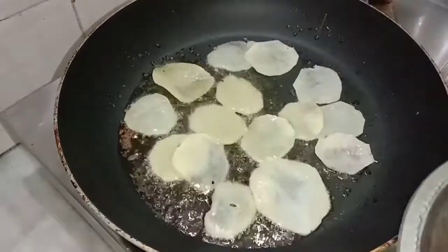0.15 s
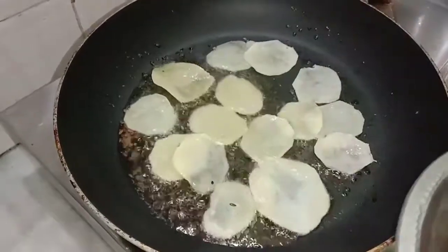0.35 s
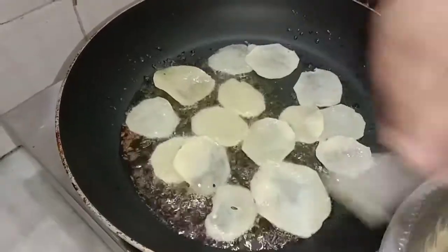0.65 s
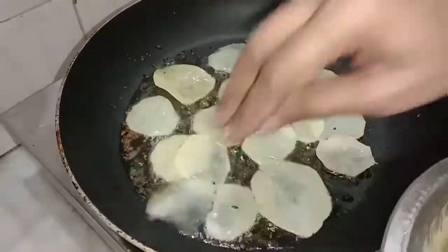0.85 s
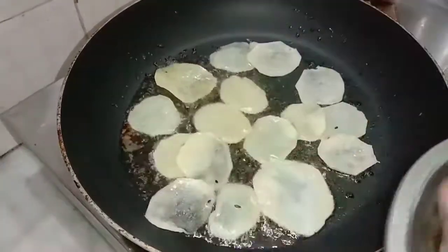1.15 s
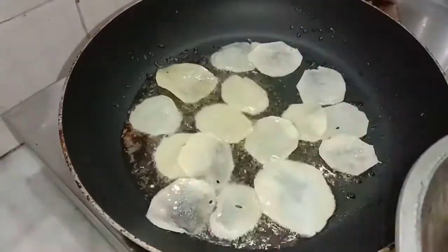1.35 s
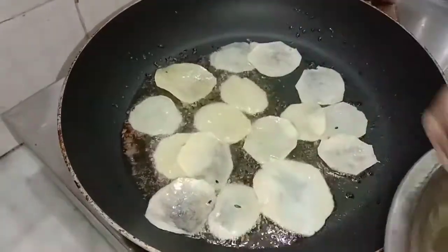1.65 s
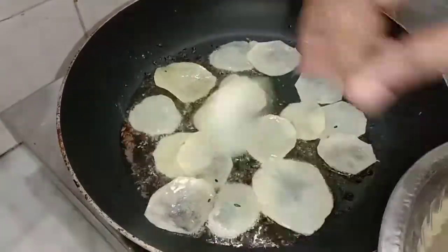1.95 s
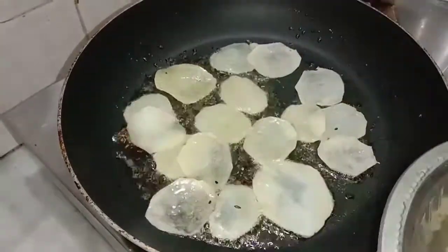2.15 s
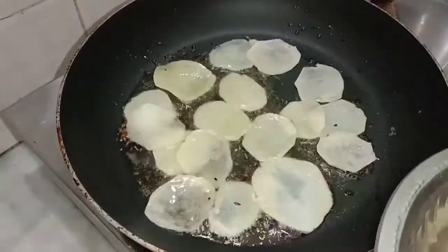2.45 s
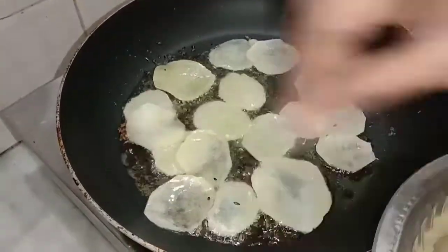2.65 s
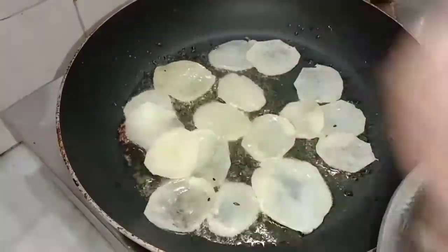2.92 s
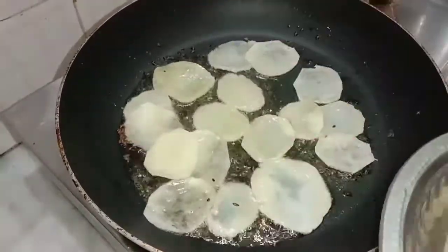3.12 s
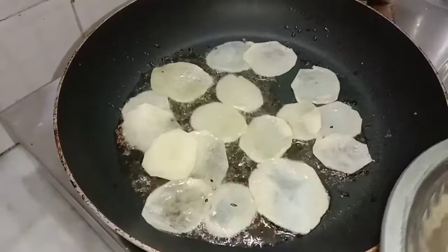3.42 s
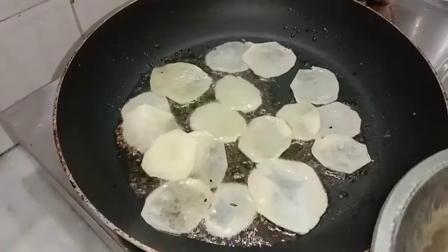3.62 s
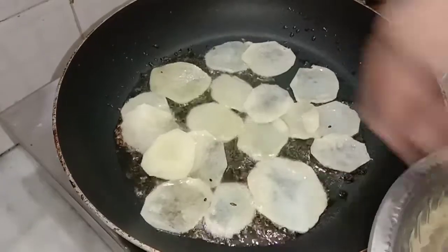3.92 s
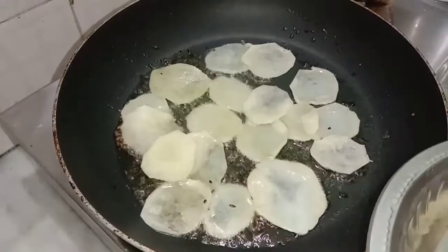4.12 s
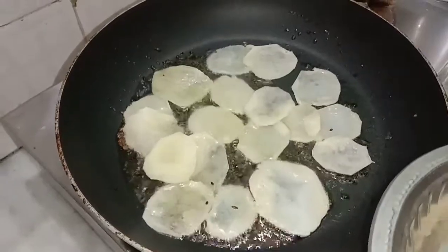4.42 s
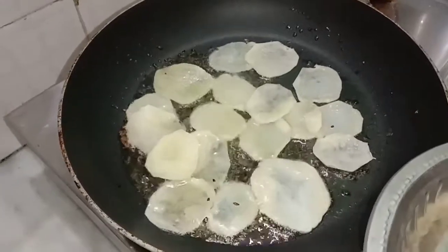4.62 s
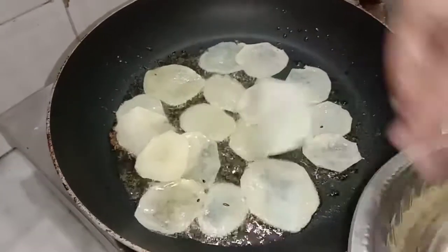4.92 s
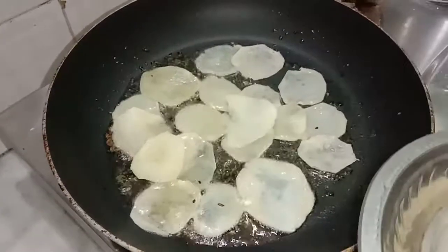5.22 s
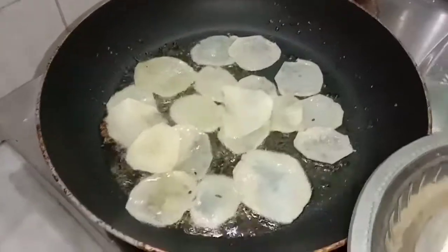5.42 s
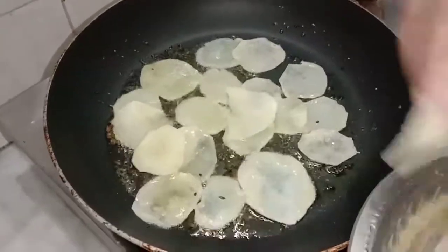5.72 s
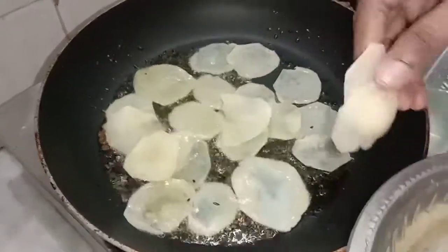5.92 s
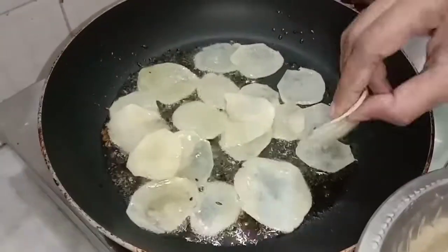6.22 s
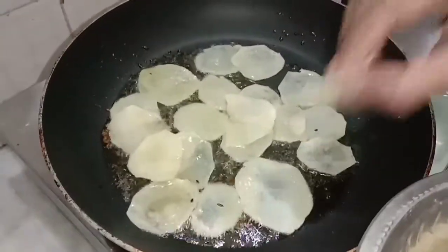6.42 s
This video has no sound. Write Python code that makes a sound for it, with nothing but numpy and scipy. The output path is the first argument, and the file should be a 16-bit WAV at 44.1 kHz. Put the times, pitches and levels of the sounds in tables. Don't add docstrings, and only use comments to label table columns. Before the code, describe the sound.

Close, bright frying sizzle in a pan, peppered with loud snaps and singing bubble pops, gradually calming; faint bird caws and soft bowl knocks behind.

```python
import sys
import numpy as np
from scipy import signal
from scipy.fft import rfft, irfft
from scipy.io import wavfile
from scipy.ndimage import minimum_filter1d

SR = 44100
rng = np.random.default_rng(int(sys.argv[2]) if len(sys.argv) > 2 else 0)


def generate_wav(sig):
    pcm = np.round(np.clip(np.atleast_2d(sig).T, -1, 1) * 32767).astype(np.int16)
    wavfile.write(sys.argv[1], SR, pcm)


def level_to_linear(level):
    exponent = np.asarray(level, float) / 20
    return 10 ** exponent


N = 289296

# (time [s], peak level [dB], bubble pitch [Hz], pan blow re peak [dB])
BIG_POPS = [(0.0765, -12, 3600, -17), (0.3537, -11.5, 4000, -15.5), (0.608, -12, 3500, -27),
            (1.045, -12.5, 3900, -18), (1.3437, -14, 4000, -16), (1.8921, -7.5, 3800, -17),
            (2.0163, -7.5, 2800, -44), (2.029, -8.5, 2980, -19), (2.0549, -12.5, 1950, -17),
            (2.061, -11, 2480, -32), (2.045, -10, 2900, -30), (2.376, -20, 3820, -22),
            (2.6692, -13.5, 3700, -26), (2.7038, -9.5, 3500, -40), (2.722, -17, 3580, -29),
            (2.7586, -17.5, 3550, -14), (2.813, -12, 3550, -21), (3.052, -15, 2900, -30),
            (3.271, -13, 4450, -28), (4.0605, -16.5, 3040, -27), (4.2506, -12.5, 3600, -19),
            (4.2877, -11, 2680, -32), (4.3056, -13, 2500, -17), (4.395, -13, 3410, -37),
            (4.498, -13, 4000, -30), (4.5082, -13, 4170, -21), (5.6077, -16, 3170, -35),
            (5.653, -15, 3770, -24), (5.9268, -13, 3930, -33), (6.1332, -14, 3580, -33),
            (6.309, -9.5, 4200, -27), (0.5355, -15, 3150, -30), (1.2473, -17, 3100, -35),
            (2.4926, -19, 2510, -25), (2.636, -26, 2800, -32), (3.682, -14, 4040, -30),
            (3.87, -15.5, 3020, -30), (2.712, -14, 3760, -30), (2.0556, -10, 3750, -30),
            (2.035, -18, 3270, -30), (4.6064, -17, 3684, -30), (4.6786, -11.5, 4090, -23),
            (4.7388, -13.5, 2650, -30), (4.793, -25, 3830, -30), (4.9475, -13.5, 2980, -13),
            (4.975, -14.5, 4600, -35), (5.4048, -11.5, 3860, -31), (5.4605, -16, 3800, -17),
            (5.9988, -17.5, 4060, -36), (6.4946, -19, 3890, -27)]
# (time [s], peak level [dB], bubble pitch [Hz], opening crack re peak [dB])
SMALL_POPS = [(0.0164, -22, 8580, 4), (0.1745, -1, 9300, -2), (0.3056, -10, 8800, -11),
              (0.3315, -5.5, 9700, 5), (0.3765, -4, 9300, -9), (0.4064, -2.5, 7200, 1.5),
              (0.566, -9.5, 9400, 5), (0.651, -9, 7100, -3), (0.767, -4, 7100, 2), (0.914, -25, 8950, -5),
              (1.05, 1, 9700, -4), (1.246, -13, 9200, 5), (1.265, -8, 6560, 1.5), (1.364, -8, 9150, 4),
              (1.8232, -16, 8800, 4), (2.132, -5, 9500, -4), (2.3013, -12, 8800, 12), (2.387, -1, 9500, -4),
              (2.5309, -5, 9120, -7), (2.833, -10.5, 8850, 3), (3.1975, -7, 10200, 5),
              (3.3692, -5, 8750, -7), (3.404, -9.5, 6650, 0), (3.8207, -9, 8240, 6),
              (4.8936, -6.5, 6700, -2), (4.827, -14, 6760, -7), (4.839, -11, 6500, -0.5),
              (4.765, -16, 6850, -11), (4.9307, -10, 8350, 6), (5.2202, -8.5, 5860, -4),
              (5.3666, -7, 9700, -14), (5.4048, -1.5, 8850, -11), (5.46, -7.5, 7200, 1),
              (5.9866, -9, 7270, 4)]
# (time [s], peak level [dB], centre [Hz], pan blow re peak [dB])
SLAMS = [(0.466, 0, 3970, -12), (0.767, -8, 4000, -44), (0.8251, -5.5, 2960, -11.5),
         (0.8724, -8.5, 3550, -8.5), (0.9328, -15, 2750, -6), (1.1516, 0.5, 2970, -13),
         (1.3217, -6, 3380, -11), (1.8524, 2.5, 3960, -16.5), (3.1499, -13.5, 1980, -3.0),
         (3.3298, -12.5, 1970, -3), (3.438, -8.5, 3470, -12.5), (3.976, -18, 3470, 4),
         (4.1597, -9, 1790, -11), (4.44, -10, 3840, -8.5), (4.6685, -14, 2900, -7.5),
         (5.367, -7.5, 3440, -6.5), (5.7356, -9, 3570, -15.5), (5.6077, -10, 4000, -24),
         (4.881, -20, 2500, -6), (5.031, -19, 3000, -9), (0.3311, -17, 3000, -9.5),
         (0.6529, -15, 5000, -20)]
# (frequency [Hz], density [dB per Hz])
CRACK = [(300, -42), (700, -24), (1200, -9.5), (3000, -4.5), (9500, -1), (13600, -13), (14900, -1),
         (15500, 0)]


def rms_one(x):
    return x / np.sqrt(np.mean(x ** 2) + 1e-20)


def in_time(rows):
    s, *columns = np.transpose(rows)
    return [np.interp(np.arange(N) / SR, s, c) for c in columns]


def colour(x, points):
    point_hz, point_db = np.transpose(points)
    hz = np.maximum(np.fft.rfftfreq(4096, 1 / SR), 1)
    gain_db = np.interp(np.log(hz), np.log(point_hz), point_db)
    cepstrum = irfft(np.log(level_to_linear(gain_db)))
    cepstrum[1:2048] *= 2
    cepstrum[2049:] = 0
    impulse = irfft(np.exp(rfft(cepstrum)))
    return signal.fftconvolve(x, impulse)[:len(x)]


def resonance(x, hz, width_hz):
    r = np.exp(-np.pi * width_hz / SR)
    b = [(1 - r * r) / 2, 0, (r * r - 1) / 2]
    a = [1, -2 * r * np.cos(2 * np.pi * hz / SR), r * r]
    return signal.lfilter(b, a, x + 1e-18)


def chance_clicks(per_s, spread_db):
    size_db = spread_db * np.minimum(rng.exponential(1, N), 4)
    return (rng.random(N) < per_s / SR) * level_to_linear(size_db)


def fade(s, start, end, edge_s):
    return np.clip(np.minimum(s - start, end - s) / edge_s, 0, 1)


def add(out, s, sound):
    i = round(s * SR)
    out[i:i + len(sound)] += sound[:N - i]


def rumble():
    # (frequency [Hz], density [dB per Hz])
    rumble_spectrum = [(15, -70), (25, -10), (43, -14.5), (102, 3), (164, 1.5), (233, -11), (303, -4),
                       (379, -17.5), (700, -17), (910, -5), (1540, -120)]
    # (time [s], length [s], rise [dB])
    swells = [(0, 0.17, 8.6), (1.28, 0.32, 5.2), (1.9, 0.095, 14), (2.1, .3, 2.4), (3.05, 0.43, 4.1),
              (3.25, 0.17, 2.3), (5.1, 0.088, 9.3), (5.42, 0.12, 16), (5.72, 0.28, 7.5), (6.3, 0.3, 5.6)]
    s, db = np.arange(N) / SR, -58
    for at, length_s, rise_db in swells:
        db = db + rise_db * np.exp(-(2 * (s - at) / length_s) ** 2)
    return level_to_linear(db) * rms_one(colour(rng.standard_normal(N), rumble_spectrum))


def bird():
    # (start [s], end [s], pulse rate [per s], throat pitch [Hz], level [dB])
    caws = [
        (0.312, 0.495, 106, 1540, -32.5),
        (0.832, 1.126, 157, 1510, -31),
        (1.416, 1.773, 118, 1650, -30),
        (5.478, 5.87, 94, 1560, -36.5),
        (6.36, 6.604, 124, 1380, -33.5),
    ]
    # (start [s], end [s], pitch [Hz], level [dB])
    whistles = [(0, 0.115, 512, -55), (0.237, 0.437, 448, -56), (0.93, 1.12, 1590, -40),
                (0.384, 0.497, 1593, -41), (1.46, 1.72, 900, -50), (1.46, 1.6, 1790, -41),
                (1.55, 1.71, 1830, -40), (5.5, 5.63, 1830, -45), (5.62, 5.84, 1590, -44),
                (6.38, 6.56, 1590, -44), (1.39, 1.803, 365, -67.5), (3.497, 3.612, 295, -63.5),
                (4.38, 4.48, 295, -63), (4.595, 4.71, 298, -61), (4.946, 5.037, 298, -55),
                (5.2, 5.29, 295, -56), (5.42, 5.62, 101, -52), (6.3, 6.5, 104, -57)]
    waver, waver_hz = .006, 9
    s, out = np.arange(N) / SR, np.zeros(N)
    rasp = rng.standard_normal(N)
    for start, end, per_s, hz, db in caws:
        pulses = np.diff(np.floor(per_s * s), prepend=0) + .06 * rasp
        throat = resonance(resonance(pulses, hz, 530), hz, 590)
        out += level_to_linear(db) * rms_one(throat) * fade(s, start, end, edge_s=0.11)
    for start, end, hz, db in whistles:
        swing = waver * hz / waver_hz * np.sin(2 * np.pi * waver_hz * s)
        note = np.sin(2 * np.pi * hz * s + swing)
        out += level_to_linear(db + 7.5) * note * fade(s, start, end, edge_s=0.042)
    return out


def knocks():
    # (time [s], peak level [dB], low edge [Hz], high edge [Hz], t60 [s])
    bowl_hits = [(1.26, -22, 134, 310, 0.036), (1.277, -28, 150, 397, 0.035), (1.322, -23, 252, 1100, 0.17),
                 (1.894, -30, 120, 800, 0.11), (2.49, -39, 302, 650, 0.43), (2.99, -30, 400, 1010, 0.29),
                 (3.179, -21.5, 111, 330, 0.047), (3.974, -23.5, 400, 1280, 0.27),
                 (3.981, -35.5, 120, 218, .08), (4.157, -30.5, 119, 900, 0.21), (4.44, -32, 251, 900, 0.27),
                 (4.86, -31, 402, 1200, 0.06), (5.367, -12.5, 416, 1610, 0.053),
                 (5.406, -25, 100, 900, 0.085)]
    out, t = np.zeros(N), np.arange(8000) / SR
    for s, db, low_hz, high_hz, t60 in bowl_hits:
        push = 0.83 * (t < .5 / high_hz)
        blow = (rng.standard_normal(len(t)) + push) * level_to_linear(-60 * t / t60)
        band = signal.butter(2, [low_hz, high_hz], "band", fs=SR, output="sos")
        sound = signal.sosfilt(band, blow)
        add(out, s, level_to_linear(db) * sound / np.abs(sound).max())
    return out


def kitchen(x, t60=0.15):
    t = np.arange(SR // 2) / SR
    tail = rng.standard_normal(len(t)) * level_to_linear(-60 * t / t60) * (t > .004)
    tail = signal.lfilter([1], [1, -.5], tail)
    return signal.fftconvolve(x, tail / np.sqrt(np.sum(tail ** 2)))[:N]


def pan(blows):
    # (mode [Hz], width [Hz], level [dB])
    modes = [(775, 46, -10), (1270.6, 34, 13), (1418, 105, 2), (1502, 30, 0), (1814, 45, 1), (1965, 40, 1),
             (2221, 30, -2), (2519, 60, 0), (2783, 45, -2)]
    out = 0
    for k, (hz, width_hz, db) in enumerate(modes):
        out = out + (-1) ** k * level_to_linear(db) * resonance(blows, hz, width_hz)
    return out


def splats():
    # (time [s], pressure step level [dB], spike level [dB], signed scale [1])
    drops = [
        (0.216, 7, 13, -0.96),
        (0.333, -14, -35, 0.81),
        (0.4669, -39, -14.5, 0.82),
        (1.8533, -1, 3, 0.23),
        (2.2599, 8.5, -27, 0.34),
    ]
    steps, spikes = np.zeros(N), np.zeros(N)
    for s, step_db, spike_db, sign in drops:
        add(steps, s, np.array([sign * level_to_linear(step_db)]))
        add(spikes, s, np.array([sign * level_to_linear(spike_db)]))
    pressure = signal.lfilter([1], [1, -.9995], steps) + signal.lfilter([1], [1, -.9], spikes)
    membrane = signal.butter(2, 6000, fs=SR, output="sos")
    vent = signal.butter(4, 80.5, "high", fs=SR, output="sos")
    swing = signal.sosfilt(vent, signal.sosfilt(membrane, pressure + 1e-18))
    return swing + level_to_linear(-2.0) * pan(steps + spikes)


def ticks(rows, spectrum):
    out, t = np.zeros(N), np.arange(400) / SR
    for s, db, hz in rows:
        snap = rng.standard_normal(len(t)) * np.exp(-t / .00015)
        snap[0] = -2.5
        crack = colour(0.42 * snap + 2.0 * resonance(snap, hz, hz), spectrum)
        crack = signal.sosfilt(signal.butter(2, .45 * hz, "high", fs=SR, output="sos"), crack)
        peak = np.abs(crack)
        add(out, s - np.argmax(peak) / SR, level_to_linear(db - 1) * crack / peak.max())
    return out


def cracks_of_all():
    # (time [s], peak level
    # [dB], centre [Hz])
    droplets = [(0.3845, -6, 9250), (0.5354, -11, 8640), (0.6105, -9, 8810), (0.827, -8, 9100),
                (0.8714, -4, 8650), (1.0574, -4, 8630), (1.1074, -8, 9470), (1.1513, -8, 9290),
                (1.4426, -8, 8650), (1.5429, -7, 8870), (1.5883, -8, 8740), (1.6554, -10, 8950),
                (2.2867, -9, 8470), (2.3954, -7, 9150), (2.598, -12, 9000), (2.8933, -8, 8840),
                (2.9377, -8, 9190), (3.2214, -6, 8380), (3.6217, -8, 9360), (3.7863, -9, 9180),
                (3.9235, -7, 8640), (4.2882, -6, 8460), (4.3625, -12, 9190), (4.4458, -13, 9010),
                (4.6794, -14, 9140), (4.9751, -14, 9310), (5.3198, -8, 9690), (5.4144, -10, 9470),
                (5.4484, -9, 9310), (6.2761, -10, 9270), (0.6529, -7, 8500), (1.2462, -7, 9000),
                (2.5309, -9, 8500), (0.1416, -12, 9000), (1.035, -13, 9000), (1.7564, -14, 9000),
                (3.042, -12, 9000), (4.1619, -12, 9000), (4.2617, -15, 9000), (4.571, -12, 9000),
                (4.582, -13, 7500), (4.9445, -12, 9000), (5.531, -13, 9000), (0.0772, -10, 13000),
                (0.4264, -12, 13000), (0.9143, -8, 13500), (1.6317, -10, 14000), (2.4468, -13, 12000),
                (3.5723, -14, 13000), (3.9913, -12, 13000), (4.5535, -14, 12000), (4.912, -12, 9000),
                (6.3709, -13, 13000)]
    lag_s = 0.0011
    rows = [(s + lag_s, db - 7, 0.56 * hz) for s, db, hz, _ in BIG_POPS]
    rows += [(s + lag_s, db + 2.5, 1.7 * hz) for s, db, hz, _ in SLAMS]
    rows += [(s + lag_s, db + 1.5 + min(crack_db, 4), 0.81 * hz) for s, db, hz, crack_db in SMALL_POPS]
    return rows + [(s + lag_s, db + 3, hz) for s, db, hz in droplets]


def singing():
    ring_db, ring_cycles, rise = -8, 60, .12
    out, t = np.zeros(N), np.arange(3000) / SR
    for s, db, hz, _ in BIG_POPS:
        life = hz * t / ring_cycles
        envelope = level_to_linear(db + ring_db - 60 * life) * (1 - np.exp(-t / 0.00015))
        add(out, s, envelope * np.sin(2 * np.pi * hz * t * (.97 + rise * life)))
    return out


def bursts():
    big = [(s, db + 7, hz, blow_db + 2.5, .036, .24) for s, db, hz, blow_db in BIG_POPS]
    slams = [(s, db + 5.5, hz, blow_db + 2, .022, .7) for s, db, hz, blow_db in SLAMS]
    small = [(s, db + 2, hz, -22, .03, .24) for s, db, hz, _ in SMALL_POPS]
    return big + slams + small


def pops():
    blow_t60_s = .007
    out, blows, t = np.zeros(N), np.zeros(N), np.arange(5000) / SR
    for s, db, hz, blow_db, t60, width in bursts():
        noise = rng.standard_normal(len(t))
        spray = noise * np.abs(noise) * level_to_linear(-60 * t / t60) * (1 - np.exp(-t / 0.00029))
        width_hz = 1.5 * width * hz
        tuned = resonance(resonance(spray, hz, width_hz), hz, width_hz)
        add(out, s, level_to_linear(db - 8.5) * (tuned / np.abs(tuned).max() + 0.012 * colour(spray, CRACK)))
        blow = spray * 2.8 * level_to_linear(-60 * t / blow_t60_s)
        blow[20] += 12.0
        add(blows, s, level_to_linear(db + blow_db) * blow)
    thump = signal.sosfilt(signal.butter(3, [700, 2200], "band", fs=SR, output="sos"), blows)
    return out + level_to_linear(2) * pan(blows) + level_to_linear(-4.5) * thump


def crackle(per_s, spread_db):
    clicks = chance_clicks(per_s, spread_db) * rng.choice([-1, 1], N)
    smear = rng.standard_normal(24) * np.exp(-np.arange(24) / 5.0)
    return rms_one(colour(signal.lfilter(smear, [1], clicks), CRACK))


def sparks():
    clicks = chance_clicks(per_s=97, spread_db=1.0) * rng.choice([-1, 1], N)
    dealt, out = rng.integers(0, 6, N), 0
    for k, hz in enumerate(np.geomspace(4000, 10500, 6)):
        out = out + resonance(resonance(clicks * (dealt == k), hz, .45 * hz), hz, .45 * hz)
    return rms_one(out)


def sizzle(low_hz, high_hz, per_s, spread_db, cycles, spits_per_s, spit_t60, spit_db):
    def spits():
        decay = level_to_linear(-60 / (spit_t60 * SR))
        return signal.lfilter([1], [1, -decay], chance_clicks(spits_per_s, spread_db=4.5))
    grains = chance_clicks(per_s, spread_db) * rng.choice([-1, 1], N)
    dealt, shared, out = rng.integers(0, 15, N), spits(), 0
    for k, hz in enumerate(np.geomspace(low_hz, high_hz, 15)):
        if k % 3 == 0:
            swell = 1 + level_to_linear(spit_db) * (shared + 1.2 * spits())
        out = out + resonance(grains * (dealt == k) * swell, hz, 1.67 * hz / cycles)
    return out


def frying(bubbling_db, fizz_db):
    # (frequency [Hz], density [dB per Hz])
    bubbling_spectrum = [(250, -55), (450, -12.5), (660, -24), (780, -4.5), (1030, -8), (1300, -6.5),
                         (2200, -7.5), (3300, -4.5), (4000, -5), (5000, -13), (6200, -11.5), (8500, -26),
                         (14000, -54.5)]
    fizz_spectrum = [(3290, -35), (5600, 3), (6230, -4), (6870, 7), (8040, -4), (8990, 4.5), (11000, -4.5),
                     (13700, -12), (14700, 2.5), (15500, -2.5)]
    bubbling = sizzle(604, 6200, per_s=7000, spread_db=-2.0, cycles=4.3,
                      spits_per_s=45, spit_t60=0.085, spit_db=-13.0)
    fizz = sizzle(4900, 16400, per_s=9000, spread_db=1.5, cycles=1.5,
                  spits_per_s=54, spit_t60=0.063, spit_db=-8.5)
    ring = pan(rms_one(bubbling) + 1.08 * rng.standard_normal(N))
    coarse = rms_one(colour(bubbling, bubbling_spectrum)) + level_to_linear(-3) * rms_one(ring)
    fine = rms_one(colour(fizz, fizz_spectrum))
    fine = fine + level_to_linear(-8) * crackle(per_s=290, spread_db=2.5) + level_to_linear(-7.5) * sparks()
    return level_to_linear(bubbling_db) * coarse + level_to_linear(fizz_db) * fine


def scene():
    # (time [s], vigour [dB], bubbling over fizz [dB])
    vigour = [(0.0, -23, -5.5), (0.16, -27, -3.5), (0.91, -26.5, -2.5), (2.83, -30.5, -1),
              (3.03, -28.5, -1), (3.27, -28, -2), (3.62, -31, -1), (4.16, -28.5, -2), (5.22, -32, 1),
              (5.41, -28, -3.5), (5.64, -31.5, 1), (6.56, -32, -1)]
    # (time [s], peak level [dB], centre [Hz])
    near_droplets = [
        (.2158, 2, 11000),
        (.4672, 7, 6000),
        (.7683, -1, 9000),
        (1.8529, 11, 6500),
        (2.1327, 0, 9000),
        (5.3677, -2, 8000),
        (5.4059, -1, 9000),
        (6.0875, -3, 13000),
    ]
    # (frequency [Hz], density [dB per Hz])
    snap_spectrum = [(300, -20), (1200, -7), (3000, -1), (9500, 0), (13600, -5), (15000, 4), (16000, -1),
                     (16600, -1)]
    vigour_db, coarse_db = in_time(vigour)
    hits = pops() + singing() + knocks()
    cracks = ticks(cracks_of_all(), CRACK)
    snaps = ticks(near_droplets, snap_spectrum)
    room = kitchen(level_to_linear(-11) * hits + level_to_linear(-3.5) * cracks)
    bed = frying(vigour_db + coarse_db, vigour_db + 0.13)
    near = bed + hits + cracks + room + level_to_linear(-20) * pan(cracks + snaps)
    near = signal.sosfilt(signal.ellip(12, 1, 60, 15450, fs=SR, output="sos"), near)
    return (near + snaps + bird() + rumble() + splats())[None]


def top_cut(x):
    return signal.sosfilt(signal.butter(12, 16820, fs=SR, output="sos"), x)


def record(dry):
    ceiling_db, ahead_s, attack_s, release_db_per_s = -0.5, 0.025, 0.0031, 326
    over_db = np.minimum(ceiling_db - 20 * np.log10(np.abs(dry[0]) + 1e-9), 0)
    ahead = round(ahead_s * SR)
    held_db = minimum_filter1d(over_db, ahead, origin=-(ahead // 2))
    ramp_db = release_db_per_s * np.arange(N) / SR
    released_db = np.minimum.accumulate(held_db - ramp_db) + ramp_db
    r = np.exp(-1 / (attack_s * SR))
    limited = dry * level_to_linear(signal.lfilter([1 - r], [1, -r], released_db))
    cut = signal.sosfilt(signal.ellip(10, 1, 60, 16600, fs=SR, output="sos"), limited)
    return top_cut(np.clip(cut, -1, 1))


dry = scene()
out = record(dry)
generate_wav(out)
```